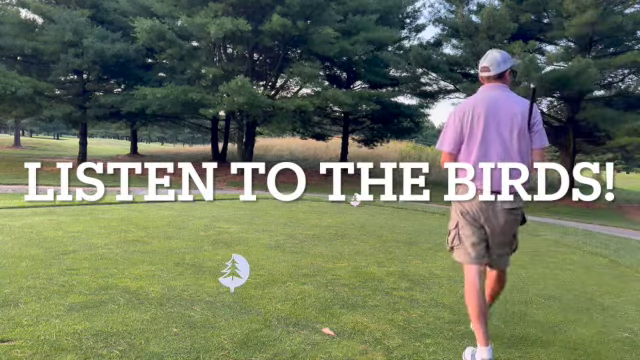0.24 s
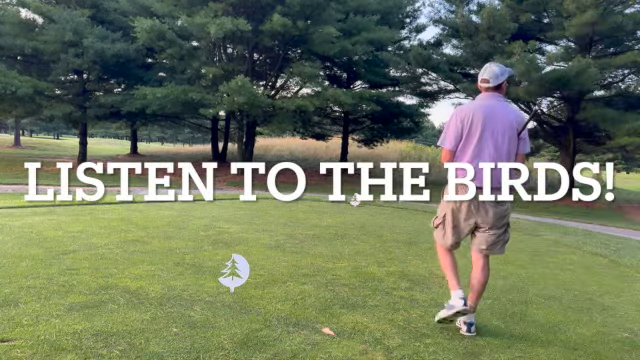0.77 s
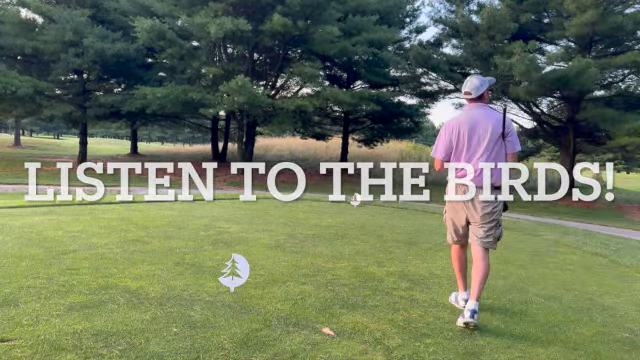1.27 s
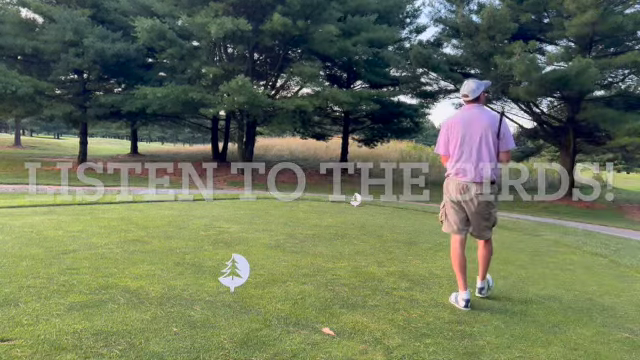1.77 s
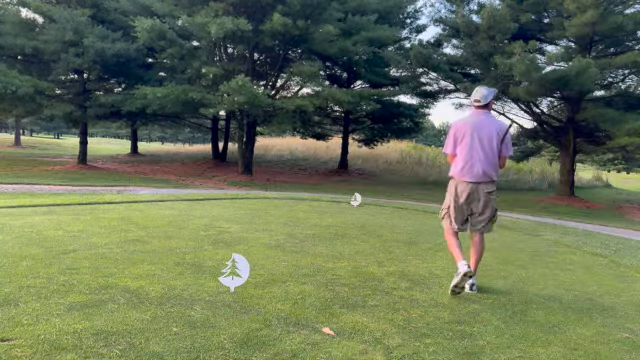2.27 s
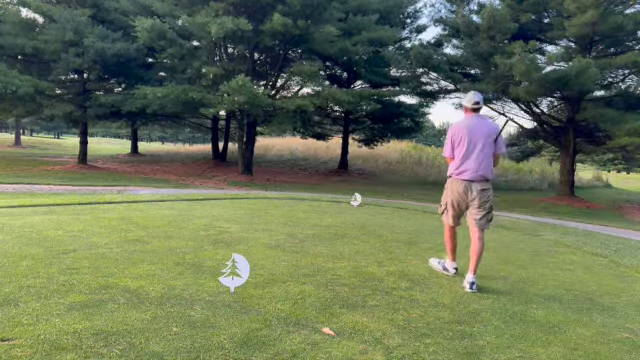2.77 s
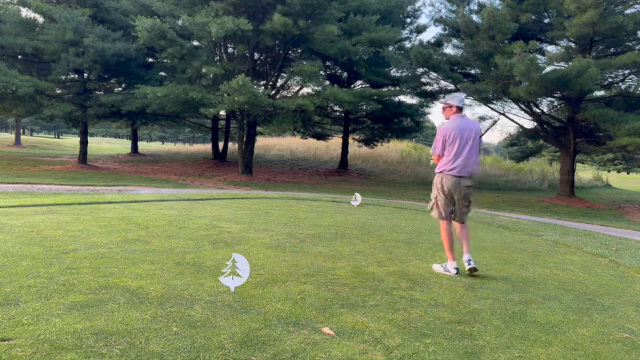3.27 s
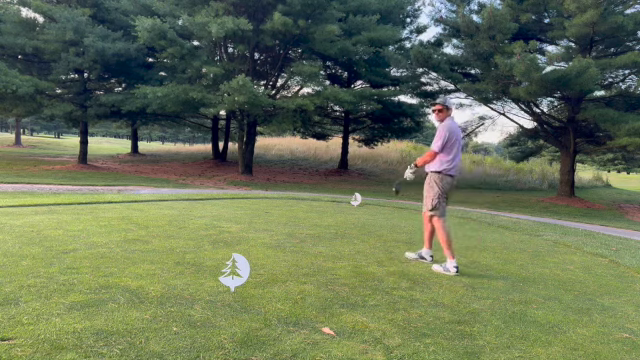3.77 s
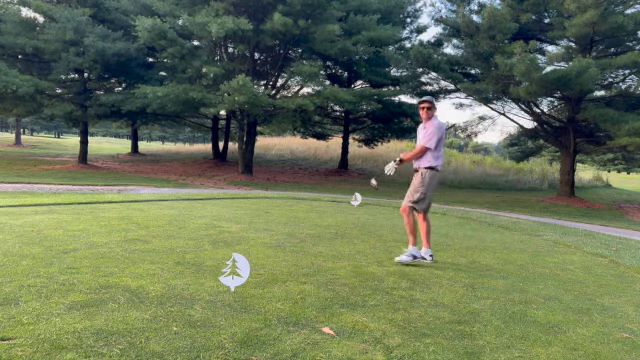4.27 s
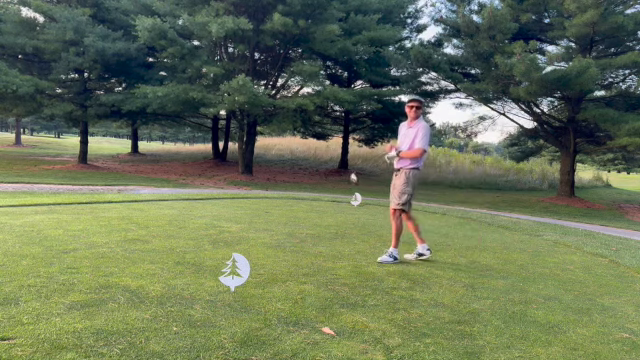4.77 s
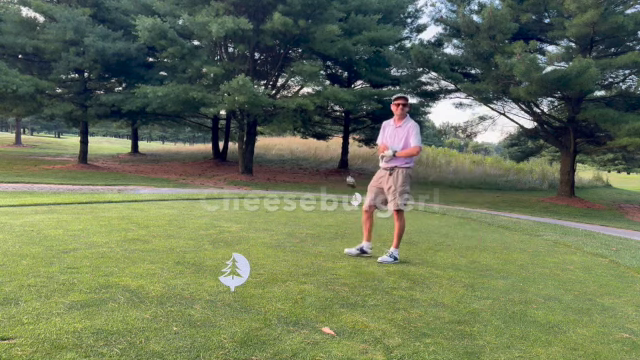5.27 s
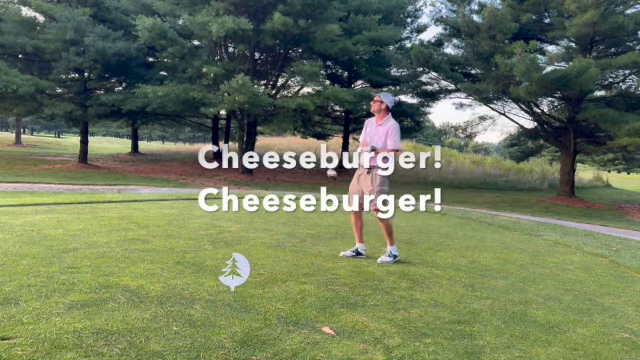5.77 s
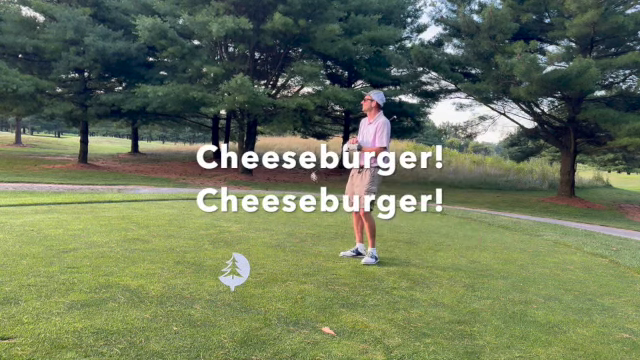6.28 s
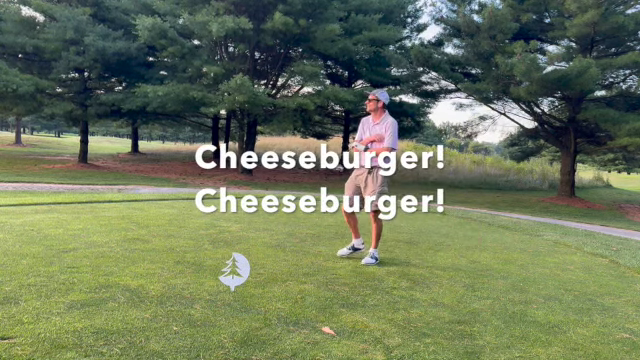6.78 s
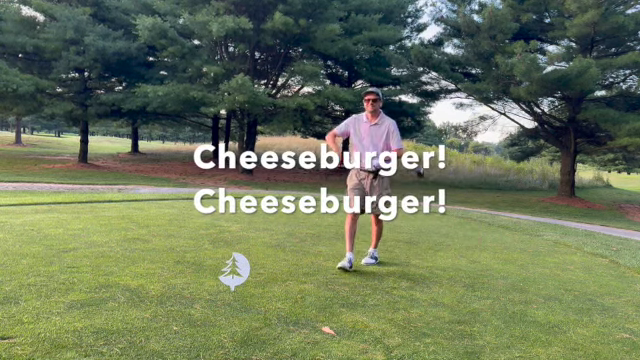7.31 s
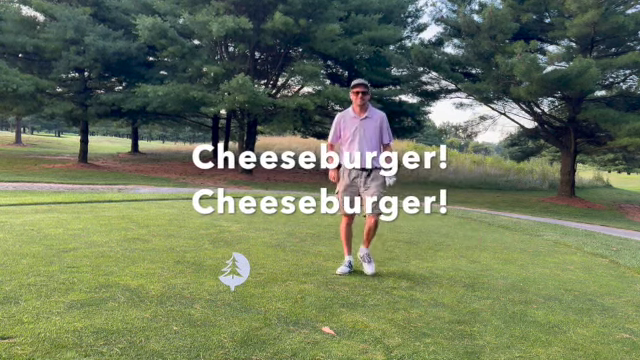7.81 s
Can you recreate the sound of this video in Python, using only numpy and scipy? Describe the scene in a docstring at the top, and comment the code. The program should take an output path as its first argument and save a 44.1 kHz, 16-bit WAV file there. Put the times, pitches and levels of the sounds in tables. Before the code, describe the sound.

Outdoors on a lawn beside trees, songbirds call over a steady deep engine rumble and soft wind, with light footsteps and one sharp scuff.

```python
"""Pines beside a golf tee: an engine drones low and wind moves in the trees from start to end. Thin high calls
and shoes brushing short grass come first, then falling chips, a songbird deep in the wood and a warbling one
on the right; a far trill swells and chickadees whistle falling songs; one buzzy call comes near the end.
Birds are unsteady near-sine whistles (the trill a train of raspy chips) that the trees scatter into soft echo;
the drone is a sum of drifting sines over noise; grass and wind are coloured noise."""
import sys
import numpy as np
from scipy import signal
from scipy.fft import rfft, irfft
from scipy.io import wavfile
from scipy.ndimage import uniform_filter1d

SR = 44100
rng = np.random.default_rng(int(sys.argv[2]) if len(sys.argv) > 2 else 0)


def file_out(sig):
    """Save sig as 16-bit WAV at sys.argv[1]."""
    # one column per channel
    cols = np.atleast_2d(sig).T
    # limit, then scale
    lim = np.clip(cols, -1, 1)
    pcm = np.round(lim * 32767).astype(np.int16)
    wavfile.write(sys.argv[1], SR, pcm)


N = 354916
T = np.arange(N) / SR  # time in s


def undb(db):
    """Decibels to gain."""
    return 10 ** (np.asarray(db) / 20)


def unit(x):
    """Scale to rms 1."""
    return x / np.sqrt(np.mean(x ** 2))


def curve(rows, t=T):
    """Each column of a table after the first, joined by straight lines."""
    s, *columns = np.transpose(rows)
    return [np.interp(t, s, column) for column in columns]


def walk(rate):
    """Smooth random drift with a spread of 1, from values drawn rate times a second."""
    k = int(SR / rate)
    held = np.repeat(rng.standard_normal(N // k + 1), k)
    smooth = uniform_filter1d(uniform_filter1d(held, k), k)
    return unit(smooth[:N])


def pan(db):
    """Left and right gains for a level difference; negative leans right."""
    return undb(np.array([[db], [-db]]) / 2)


def noise(colour, likeness, lag=0):
    """Stereo noise of a given density per Hz, dying away above its last point; the left lags by lag radians."""
    hz, db = np.transpose(colour)
    f = np.arange(N // 2 + 1) * SR / N
    density = undb(np.interp(np.log(f + 1), np.log(hz), db)) * np.sqrt(SR / 2)
    gain = density / np.maximum(f / hz[-1], 1) ** 2
    mid, side = rfft(rng.standard_normal((2, N))) * gain
    # the shares of mid and side set how alike the two channels are
    c = np.clip(likeness, 0, 1)
    mid = mid * np.sqrt((1 + c) / 2)
    side = side * np.sqrt((1 - c) / 2)
    return irfft([(mid + side) * np.exp(-1j * lag), mid - side], N)


def add(out, start_s, sound):
    """Mix a sound in at a time."""
    i = max(int(start_s * SR), 0)
    out[:, i:i + sound.shape[-1]] += sound[:, :N - i]


def whistle(hz, db, edge_s, octave_db=-50, waver=.003, lag=0.89):
    """A bird's near-sine voice: unsteady pitch, soft ends, left lagging by lag radians, octave nearly opposed."""
    t = np.arange(len(hz)) / SR
    wobble = np.interp(t * 300, np.arange(300), rng.standard_normal(300))
    phase = 2 * np.pi * np.cumsum(hz * (1 + waver * wobble)) / SR
    left = np.array([[1], [0]])
    fundamental = np.sin(phase - lag * left)
    octave = np.sin(2 * phase - 3.0 * left)
    edges = np.clip(np.minimum(t, t[-1] - t) / edge_s, 0, 1)
    gate = np.sin(np.pi / 2 * edges) ** 2
    return np.sqrt(2) * gate * undb(db) * (fundamental + undb(octave_db) * octave)


def slur(length_s, first_hz, last_hz, arch_hz):
    """The pitch of one syllable: a sweep that arches or sags in the middle."""
    u = np.linspace(0, 1, int(length_s * SR))
    return first_hz + (last_hz - first_hz) * u + arch_hz * np.sin(np.pi * u)


def trees(x, t60):
    """Trunks and boughs scatter a sound into a diffuse tail, 60 dB down after t60 s, different on each side."""
    t = T[:SR]
    decay = undb(-60 * t / t60)
    onset = 1 - np.exp(-t / .008)
    tail = rng.standard_normal((2, SR)) * decay * onset
    tail /= np.sqrt(np.sum(tail ** 2, axis=1, keepdims=True))
    return signal.fftconvolve(x[1:], tail, axes=1)[:, :N]  # the right channel feeds both sides


def swishes(rows, colour, likeness):
    """Rubbing contacts: dense uneven grains that swell quickly and die away."""
    envelope = np.zeros(N)
    for peak_s, length_s, level_db in rows:
        u = (T - peak_s) / length_s
        distance = np.where(u < 0, -3 * u, 1.5 * u)  # the rise is twice as fast as the fall
        envelope += undb(level_db) * np.exp(-distance ** 1.5)
    grains = undb(2 * walk(900))
    return envelope * unit(noise(colour, likeness) * grains)


def engine():
    """Low harmonics of one shaft and lines of the parts it drives beat into a throb, over the exhaust's rumble."""
    # lines of the shaft: shaft_multiple, level_db (before the slow changes below)
    shaft_lines = [(8, -34), (10, -25), (12, -30), (15, -28.5), (16, -52.5), (18, -27.5), (20, -27.5),
                   (21, -37.5), (24, -27.5), (28, -42), (29, -47.5), (30, -34), (32, -49.5), (33, -42),
                   (36, -47), (42, -56)]
    # lines of the driven parts: pitch_hz, level_db (before the slow changes below)
    driven_lines = [(65.5, -36), (79, -29.5), (113.5, -30), (119, -32), (148.1, -40), (213, -49),
                    (360, -62.5), (369, -59)]
    # slow changes of the deepest lines: time_s, change_db
    deep_change = [(0, -1.5), (.75, 4.5), (1.3, -1.5), (1.95, 3.5), (2.65, 3), (3.3, -4.5), (4.3, -2),
                   (5.15, 0), (5.65, -1.5), (6.1, 2), (7.3, -2), (8.05, -0.5)]
    # slow changes of the upper lines: time_s, change_db
    upper_change = [(0, -1), (1.2, 1), (2.6, 0.5), (3.5, 0), (4.1, 1.5), (5.4, 0.5), (6.8, -0.5), (7.5, 0),
                    (7.8, -6), (8.05, -4)]
    # noise of the rumble: frequency_hz, density_db per Hz
    rumble = [(15, -75), (22, -65), (30, -61), (41, -60.5), (50, -50.5), (70, -44.5), (120, -46.5),
              (135, -45), (175, -51.5), (205, -63.5), (260, -67.5), (400, -75.5), (800, -100)]
    shaft_hz, shaft_drift = 5.82, .002  # the drift is a share of the rate
    deep_below_hz, upper_above_hz = 75, 130
    start_db, growth_db_per_s = -1.76, 0.336  # the drone grows slowly louder

    turns = np.cumsum(shaft_hz * (1 + shaft_drift * walk(0.99))) / SR
    deep_db, upper_db = curve(deep_change)[0], curve(upper_change)[0]
    lines = [(np.round(multiple) * turns, db) for multiple, db in shaft_lines]
    lines += [(hz * T, db) for hz, db in driven_lines]
    drone = 0
    for cycles, db in lines:
        hz = cycles[-1] / T[-1]
        swell_db = start_db + growth_db_per_s * T
        swell_db = swell_db + deep_db * (hz < deep_below_hz) + upper_db * (hz > upper_above_hz)
        # moving air makes each line fade and drift on its own
        gain = undb(db + swell_db + 1.66 * walk(1.605))
        drift = rng.random() + 0.031 * walk(2.893)
        drone = drone + gain * np.sin(2 * np.pi * (cycles + drift))
    return pan(.35) * (np.sqrt(2) * drone + noise(rumble, likeness=0.75))


def wind():
    """Gusts swell in the pines, stronger on the right, over a steady hush of still air."""
    # smooth swells over the lull: peak_s, half_length_s, rise_db
    gusts = [(.7, .15, 1.5), (1.92, .27, 5.5), (2.83, 0.24, 2.5), (3.192, 0.092, 3.5), (3.46, 0.19, 4),
             (3.82, 0.15, 3), (4.65, 0.24, 4.5), (5.15, 0.17, 4.5), (5.572, 0.21, 5), (6.903, 0.48, 3.5),
             (7.597, .25, 4), (7.95, .16, 6.5)]
    # noise of the pines, before gusts and lull: frequency_hz, density_db per Hz
    pine_colour = [(200, -96.5), (420, -71), (600, -65.5), (760, -62.5), (950, -67), (1200, -76),
                   (1500, -75), (2000, -89), (4000, -100)]
    # noise of the still air: frequency_hz, density_db per Hz
    air_colour = [(300, -80), (1000, -75), (2000, -80.5), (2800, -83.5), (3900, -92.5), (4800, -94.5),
                  (6000, -99), (8000, -105.5), (11000, -111.5), (15500, -109)]
    lull_db = -3.5
    rises = [rise_db * np.exp(-((T - peak_s) / half_s) ** 2) for peak_s, half_s, rise_db in gusts]
    pines = noise(pine_colour, likeness=0.5, lag=1.7) * undb(lull_db + sum(rises))
    air = noise(air_colour, likeness=0.31, lag=0.4)
    return pan(-4.0) * pines + pan(-0.75) * air


def seets():
    """Close thin calls, scooped in pitch with an octave, roughened by the twigs around the bird."""
    # calls: start_s, length_s, lowest_hz, level_db, octave_db (relative to the fundamental)
    calls = [(0.247, 0.073, 6770, -35, -19), (1.194, 0.081, 6740, -37, -11), (2.359, 0.065, 6730, -50, -11),
             (3.937, 0.072, 6620, -42.5, -13.5), (7.423, .036, 7000, -53, -19.5),
             (7.481, 0.058, 6730, -53, -18)]
    # scoop of one call: share of its length, pitch over the lowest, change_db
    scoop = [(0, 1.24, -12), (.1, 1.08, -6), (.22, 1.02, -2), (.36, 1, 1), (.56, 1.01, -1), (.78, 1.07, -8),
             (1, 1.19, -11)]
    out = np.zeros((2, N))
    for start_s, length_s, lowest_hz, level_db, octave_db in calls:
        bend, change_db = curve(scoop, np.linspace(0, 1, int(length_s * SR)))
        voice = whistle(lowest_hz * bend, level_db + change_db, edge_s=.005,
                        octave_db=octave_db, waver=.006, lag=.4)
        add(out, start_s, voice)
    twigs = trees(out, t60=.05)[0]  # the same on both sides
    wood = trees(out, t60=.5)
    return pan(-.6) * (out + undb(-11) * twigs + undb(-16) * wood)


def footsteps():
    """Shoes brush and scuff the turf: bursts of grainy noise, brighter for grass and duller for scuffs."""
    # brushes through the grass: peak_s, length_s, level_db
    brushes = [(.33, 0.37, -58), (.41, .02, -64), (.475, .015, -61), (.64, .05, -60), (.79, 0.034, -56),
               (1.19, 0.05, -47.5), (1.304, 0.002, -40), (1.455, 0.057, -49.5), (1.54, 0.085, -54.5),
               (1.89, 0.12, -60.5), (2.3, 0.022, -57), (2.82, 0.032, -59), (3.14, .05, -61),
               (3.47, 0.079, -55), (3.79, .025, -59), (4.19, .05, -64), (4.955, 0.026, -47),
               (5.35, 0.035, -54.5), (5.79, 0.041, -57.5), (7.0, .06, -58), (7.56, 0.17, -64),
               (7.72, 0.042, -63), (7.95, 0.19, -66)]
    # close scuffs: peak_s, length_s, level_db
    scuffs = [(1.193, .014, -32), (6.1297, .003, -19.5), (6.1345, .005, -24.5), (6.149, 0.02, -28.5),
              (6.162, 0.045, -35)]
    # relative colour of brushed grass: frequency_hz, density_db per Hz
    grass_colour = [(500, -12), (2000, -1), (5000, 0), (8500, 0), (12000, -4), (16000, -5)]
    # relative colour of a scuff: frequency_hz, density_db per Hz
    scuff_colour = [(100, -8), (350, -3), (750, 0), (1500, -8), (3000, -17), (7000, -29), (10000, -44),
                    (16000, -47)]
    grass = swishes(brushes, grass_colour, likeness=0.36)
    return grass + pan(-1.9) * swishes(scuffs, scuff_colour, likeness=0.81)


def chips():
    """Steep little downward chips, mostly in runs of three, doubled by boughs and trailed by the wood."""
    # quick falling chips: start_s, first_hz, last_hz, level_db (before the common trim)
    falls = [(.517, 3950, 3020, -47), (.647, 3750, 2980, -47), (.768, 3950, 3050, -55),
             (2.312, 3900, 3250, -47), (4.678, 4250, 3250, -49.5), (4.797, 3850, 3150, -53),
             (4.922, 3700, 3050, -54.5)]
    out = np.zeros((2, N))
    for start_s, first_hz, last_hz, level_db in falls:
        pitch_hz = slur(.037, first_hz, last_hz, arch_hz=-28.5)
        add(out, start_s, whistle(pitch_hz, level_db, edge_s=0.011, waver=0.0085, lag=0.81))
    boughs = undb(-8) * trees(out, t60=.08)
    wood = undb(-7.0) * trees(out, t60=0.33)
    return pan(-1.5) * (undb(-0.5) * out + boughs + wood)


def far_warbler():
    """Short held or swinging whistles from deep in the wood, heard mostly as echo."""
    # phrases: start_s, length_s, centre_hz, swing as a share of the pitch, level_db (before the direct/echo mix)
    phrases = [(1.0, 0.039, 3500, 0.014, -55), (2.42, 0.066, 2194, .005, -52.5),
               (3.036, 0.21, 2715, 0.036, -47), (3.154, 0.042, 3410, 0.0052, -48.5),
               (3.27, 0.075, 2184, .005, -51.5), (3.632, 0.056, 2683, 0.011, -44.5),
               (3.7, 0.089, 2240, 0.0045, -48), (4.03, 0.065, 2920, 0.045, -45.5),
               (4.2, 0.031, 2485, 0.0058, -40.5), (4.656, 0.08, 2224, 0.012, -45),
               (5.671, 0.052, 2620, .01, -51)]
    swing_hz = 11
    out = np.zeros((2, N))
    for start_s, length_s, centre_hz, depth, level_db in phrases:
        swing = np.sin(2 * np.pi * (swing_hz * T[:int(length_s * SR)] + rng.random()))
        voice = whistle(centre_hz * (1 + depth * swing), level_db, edge_s=.012, waver=.012, lag=1.2)
        add(out, start_s, voice)
    return pan(-4.0) * (out / 2 + undb(0.5) * trees(out, t60=.6))


def warblers():
    """The nearer songbird strings slurs into short phrases; the fainter ones carry more echo."""
    # syllables: start_s, length_s, first_hz, last_hz, arch_hz of the middle, strength_db (sets direct and echo)
    syllables = [(1.04, 0.071, 2670, 3120, 201, -45.5), (1.206, 0.076, 2360, 2350, 0, -47),
                 (1.727, .036, 2846, 2590, 27, -45), (1.762, 0.022, 2380, 2100, -33, -39),
                 (1.812, 0.014, 2800, 2480, 1, -44), (1.914, 0.029, 2460, 2080, -32, -42),
                 (3.652, 0.036, 2340, 2680, 0, -37.5), (3.706, .06, 3520, 3215, -50, -36),
                 (3.759, 0.028, 3240, 2640, -2, -39), (3.782, 0.062, 2640, 2380, -34, -37.5),
                 (3.86, .045, 2430, 2493, 1.5, -34.5), (4.223, 0.032, 2430, 2950, 1, -41),
                 (4.255, 0.058, 2940, 3120, 38, -39), (4.309, 0.034, 2970, 3226, 87, -28.5),
                 (4.349, .041, 3080, 2060, -62, -34), (4.401, 0.027, 2086, 2890, -4, -35),
                 (4.436, 0.028, 2204, 2790, -4.5, -35), (4.469, .084, 2283, 2225, -28.5, -33),
                 (4.615, .032, 2556, 3190, 58, -36), (4.644, 0.024, 3120, 2470, 0, -33.5),
                 (4.603, 0.031, 4250, 4680, -3, -54.5), (4.745, 0.031, 3950, 4670, -2, -52),
                 (5.107, 0.034, 2416, 2790, -61, -38), (5.133, 0.042, 2296, 2190, -32, -42),
                 (5.186, .013, 2520, 3100, 0, -42.5), (5.208, 0.019, 2970, 2350, 2.5, -39.5),
                 (5.286, .037, 2230, 2020, 38.5, -45), (5.304, .016, 2740, 3330, -0.5, -42),
                 (5.369, .019, 2850, 3600, 0.5, -48), (6.048, .03, 2870, 3410, -41, -39),
                 (6.056, .027, 3550, 2770, -0.5, -35), (6.08, 0.032, 2820, 2610, -3.5, -31.5),
                 (6.1, 0.022, 2480, 2020, 4, -36), (6.179, 0.037, 2330, 2435, -1.5, -33.5),
                 (6.206, 0.028, 2575, 2030, 1.5, -36), (6.222, 0.017, 2760, 2380, -1, -37),
                 (6.61, .025, 4500, 3050, 0.5, -46.5), (6.628, 0.035, 2930, 3620, 61.5, -36),
                 (6.658, 0.024, 2130, 2530, 2, -39.5), (6.679, 0.044, 2487, 2620, 71.5, -31),
                 (6.715, 0.038, 2640, 2290, -0.5, -34), (6.769, .015, 3520, 2500, 0, -41),
                 (6.785, 0.034, 3004, 3100, 120.5, -32), (6.819, 0.025, 2460, 2010, -41.5, -37),
                 (7.165, 0.021, 3180, 4000, 61, -45.5), (7.179, 0.021, 3120, 2900, 1, -40),
                 (7.201, 0.049, 2850, 2575, -110, -31), (7.245, 0.043, 2906, 3030, 221, -29.5),
                 (7.293, .037, 2730, 1980, -71, -37), (7.333, .052, 2030, 2470, 83, -36)]
    # the bird sits to the right; nearby boughs double its voice, the wood behind adds a tail
    side_db, boughs_db, wood_db = -16, -18.5, -18.3
    direct, scattered = np.zeros((2, 2, N))
    for start_s, length_s, first_hz, last_hz, arch_hz, strength_db in syllables:
        pitch_hz = slur(length_s, first_hz, last_hz, arch_hz)
        voice = whistle(pitch_hz, 0, edge_s=.007, waver=.008, lag=2.05)
        add(direct, start_s, undb(strength_db - 9.5) * voice)
        add(scattered, start_s, undb(.8 * strength_db) * voice)
    echo = undb(boughs_db) * trees(scattered, t60=.1) + undb(wood_db) * trees(scattered, t60=.6)
    return pan(side_db) * direct + pan(-4.5) * echo


def trill():
    """A far bird repeats one quick raspy chip, uneven in strength; the wood fills the gaps with a shimmer."""
    # swelling and fading: time_s, strength_db (before the common cut)
    swell = [(2.0, -77.5), (3.0, -58.5), (4.7, -55.5), (5.1, -52), (5.42, -49.5), (5.8, -57), (6.05, -67),
             (6.55, -57), (6.85, -66), (7.25, -55), (7.7, -74)]
    # the trill slows at its height: time_s, chips per s
    chip_rate = [(5.45, 13.45), (5.75, 12.1)]
    peak_s, pitch_hz = 5.413, 4790  # time of the strongest chip, pitch at the middle of a chip
    duty, fall = .11, .12  # chip width as a share of the cycle, fall as a share of the pitch per cycle
    clear_db = -48  # from this strength up the chips stand clear of their echo; weaker ones sink into it

    count = np.cumsum(curve(chip_rate)[0]) / SR
    cycle = (count - np.interp(peak_s, T, count) + .5) % 1 - .5
    rasp = .014 * walk(13) + .035 * walk(600)
    phase = 2 * np.pi * np.cumsum(pitch_hz * (1 - fall * cycle + rasp)) / SR
    strength_db = curve(swell)[0]
    train = unit(np.exp(-(cycle / duty) ** 2) * np.sin(phase))
    train = train * undb(strength_db - 7.5 + 2.5 * walk(14))
    train = np.array([train, train])
    clear = undb(np.minimum(strength_db - clear_db, 0) / 2)
    return undb(-1) * clear * train + undb(1.3) * trees(train, t60=.7)


def chickadees():
    """A high sagging whistle, then a lower one in two pulses; each note holds, slides and holds again."""
    # notes, a high "fee" and then a lower "bee": start_s, length_s, first_hz, last_hz,
    # place of the slide as a share of the note, starting level_db, change_db over the note
    notes = [(2.245, 0.13, 3760, 3730, 0.57, -51.5, -0.5), (2.374, 0.31, 3700, 3463, 0.24, -43.5, -9.5),
             (2.768, 0.18, 3125, 3020, 0.98, -44, -0.5), (2.978, 0.18, 3090, 3135, 0.24, -44, 2.5),
             (5.682, 0.14, 3580, 3470, 0.53, -42.5, -7.5), (5.804, .255, 3665, 3493, 0.22, -42, -1),
             (6.221, .2, 3117, 3035, 0.44, -40.5, -8.5), (6.436, .2, 3135, 3115, .5, -42.5, -2)]
    slide_width = 0.16  # share of the note
    flutter_hz, flutter_db = 75, 2.1  # moving air makes a long whistle flutter: changes per s, spread
    out = np.zeros((2, N))
    for start_s, length_s, first_hz, last_hz, slide_at, level_db, change_db in notes:
        u = np.linspace(0, 1, int(length_s * SR))
        slide = (1 + np.tanh((u - slide_at) / slide_width)) / 2
        pitch_hz = first_hz + (last_hz - first_hz) * slide
        add(out, start_s, whistle(pitch_hz, level_db + change_db * u, edge_s=0.026, waver=0.0086))
    out = out * undb(flutter_db * walk(flutter_hz))
    return pan(-1.2) * (out + undb(-8) * trees(out, t60=.5))


def buzz():
    """A high call made raspy by a fast, uneven pitch shake."""
    # the one call: start_s, length_s, pitch_hz
    start_s, length_s, pitch_hz = (6.975, .105, 7100)
    out = np.zeros((2, N))
    shake = np.sin(2 * np.pi * 130 * T[:int(length_s * SR)])
    uneven = walk(1500)[:len(shake)]
    add(out, start_s, whistle(pitch_hz * (1 + .03 * shake + .045 * uneven), 0, edge_s=.025, waver=.02))
    return undb(-52.5) * pan(-7.0) * (out + trees(out, t60=0.78) / 2)


def scene():
    """Engine, wind, footsteps and birds."""
    birds = seets() + chips() + far_warbler() + warblers() + trill() + chickadees() + buzz()
    return engine() + wind() + footsteps() + birds


def record(dry):
    """The recorder cuts the treble above 15.8 kHz; the sound starts and stops softly."""
    fade_s, top_hz = .004, 15800
    fade = np.minimum(np.minimum(T, T[-1] - T) / fade_s, 1)
    lowpass = signal.ellip(10, .2, 80, top_hz, fs=SR, output="sos")
    return signal.sosfilt(lowpass, dry * fade)


dry = scene()
out = record(dry)
file_out(out)
```